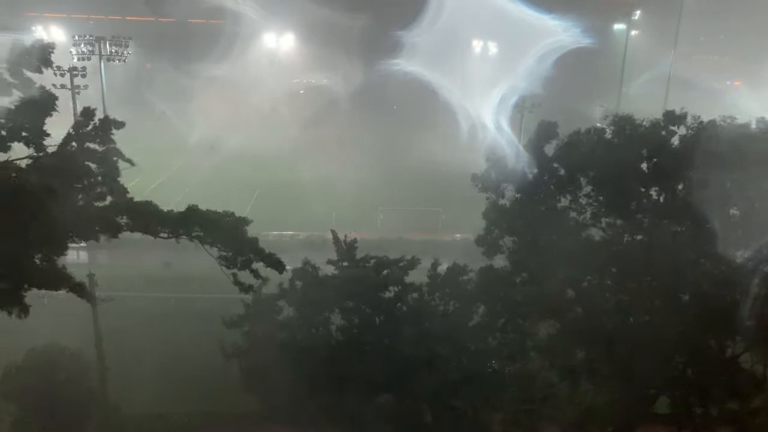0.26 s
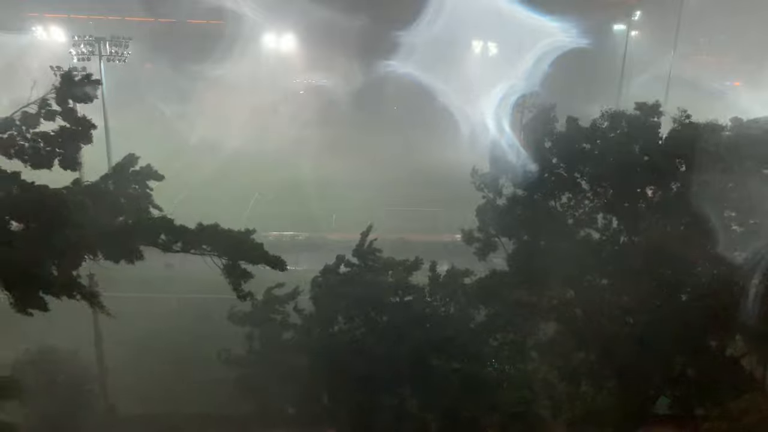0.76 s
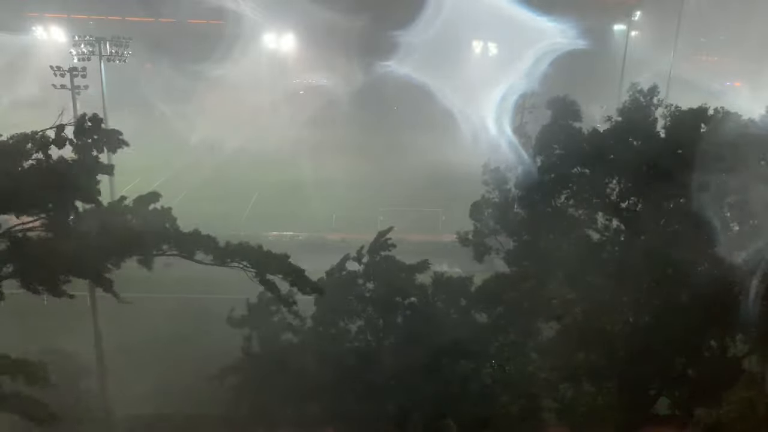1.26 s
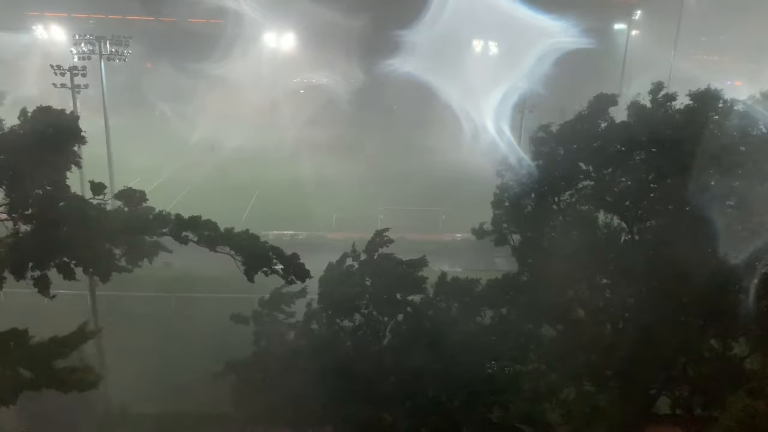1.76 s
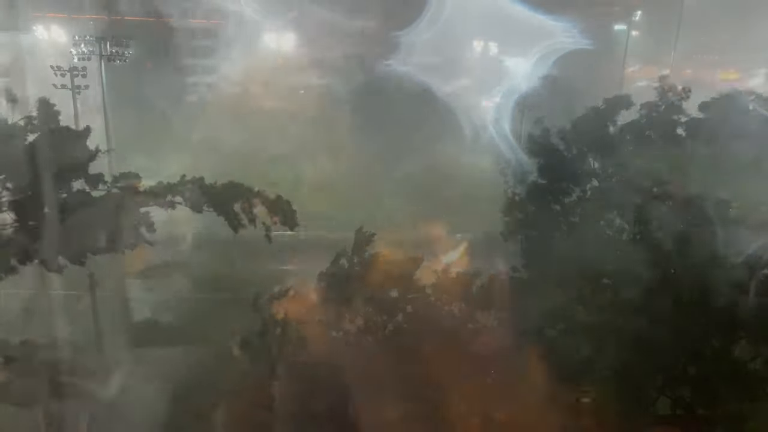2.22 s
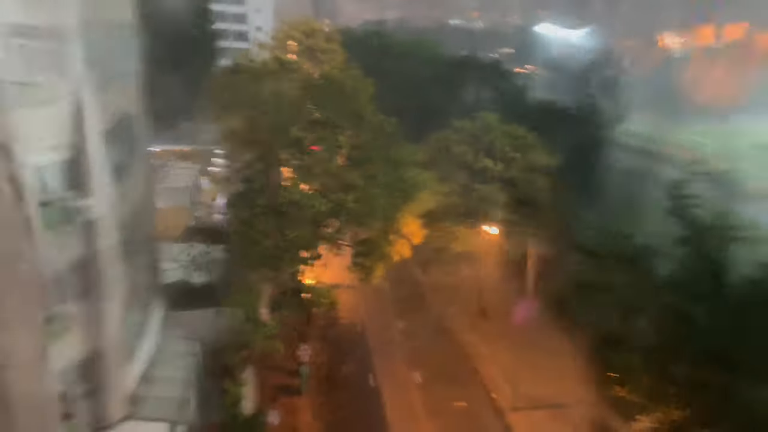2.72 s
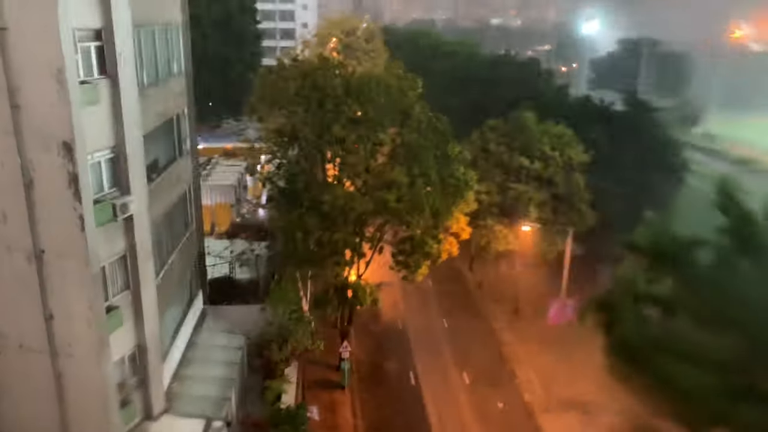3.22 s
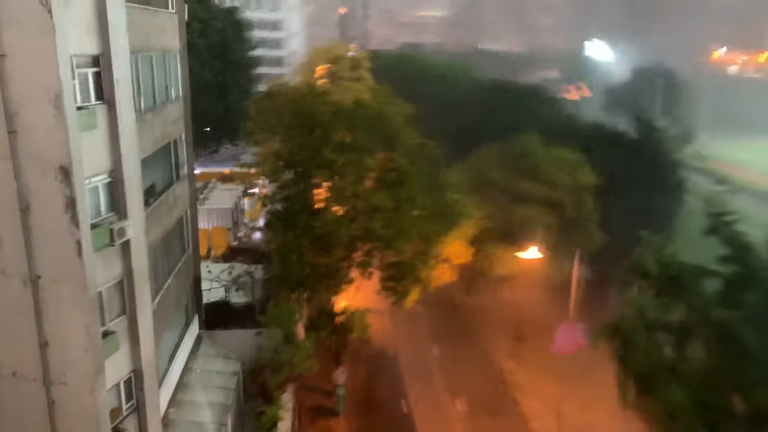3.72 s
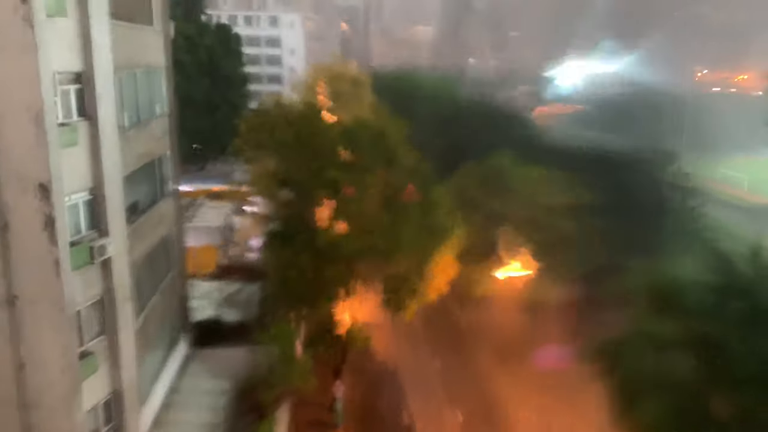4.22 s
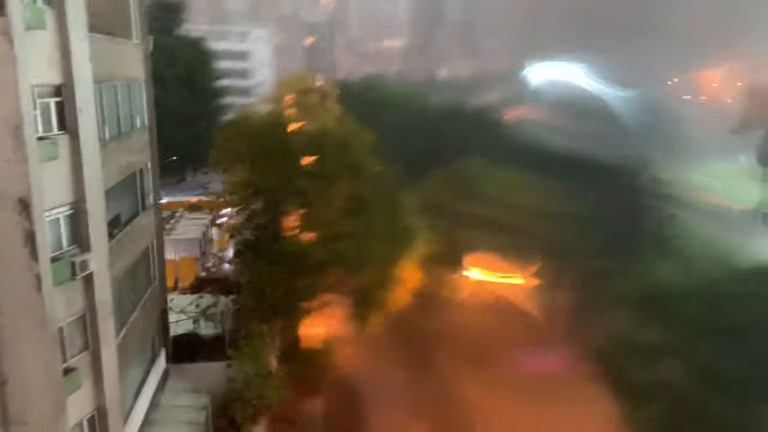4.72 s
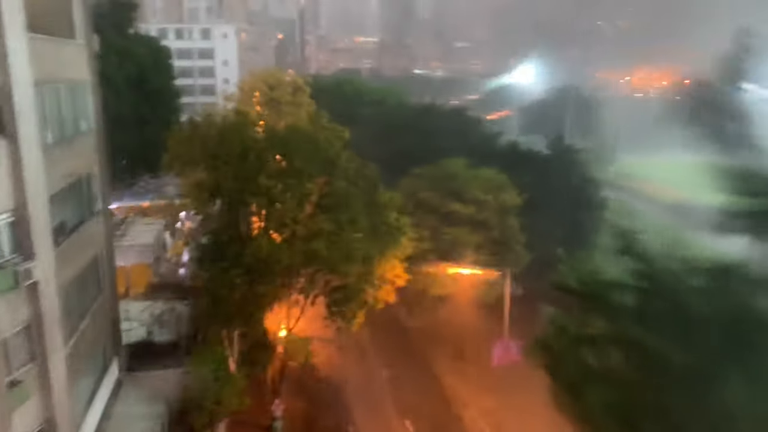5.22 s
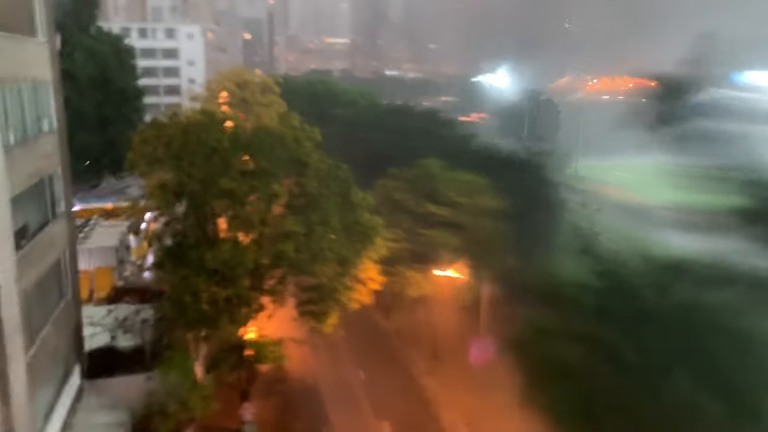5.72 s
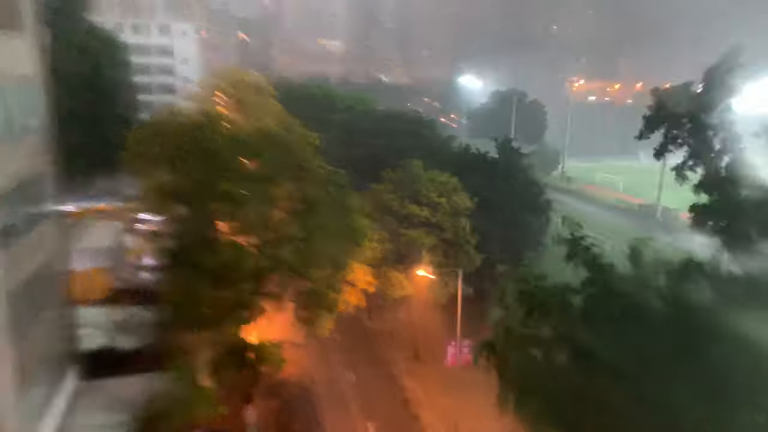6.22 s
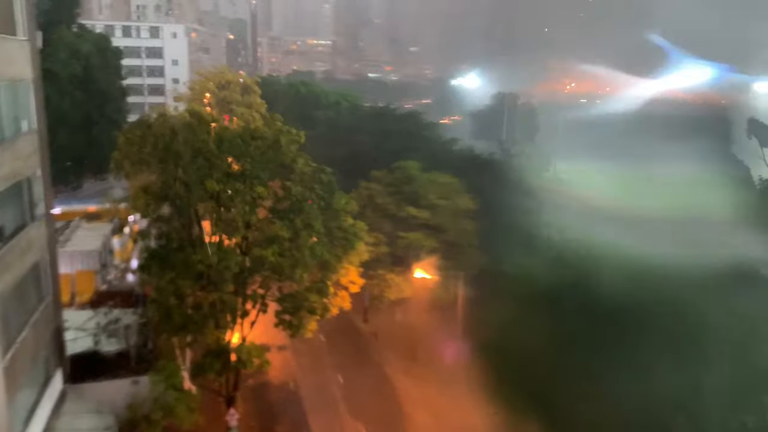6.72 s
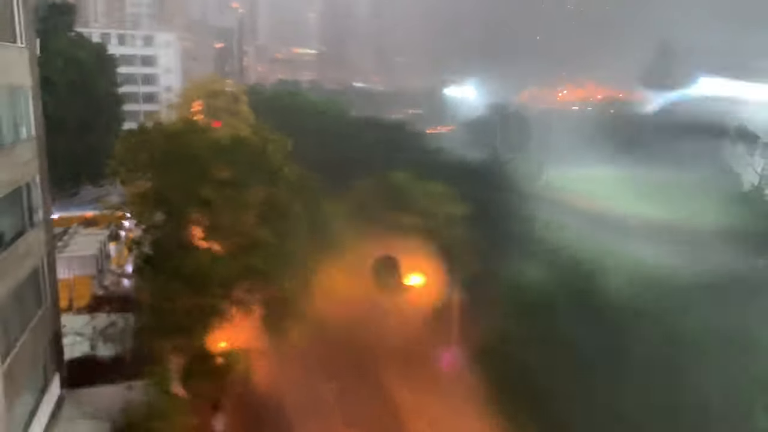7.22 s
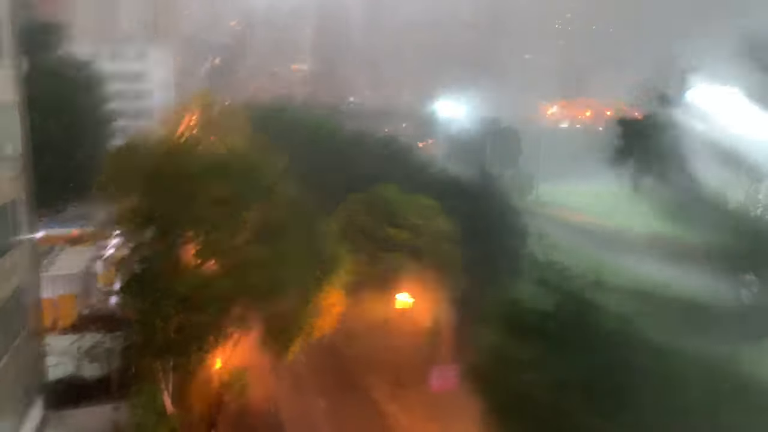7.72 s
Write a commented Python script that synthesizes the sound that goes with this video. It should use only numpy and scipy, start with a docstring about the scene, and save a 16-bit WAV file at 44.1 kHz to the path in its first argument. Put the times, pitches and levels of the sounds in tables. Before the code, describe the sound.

Inside a room during a violent night storm, dull, quiet rain lies under deep wavering wind and thunder rumble. After about two seconds it crossfades to a closer window: dense drops rattle on the glass in irregular sheets, with hissing spray, resonant splats, short pings and hollow whooshes. The frame gives one thump midway and a cluster of heavy low thuds near the end. Close, wide stereo.

```python
"""A room behind a closed window in a thunderstorm, heard in two scenes that crossfade.
Muffled rain noise outside gives way to dense random drops that excite the pane's modes.
Noise through the room's low modes makes the boom of wind and far thunder; decaying sines make thumps and pings.
Noise bursts make splats; resonated noise makes whooshes. The treble mostly reaches the right port first."""
import sys
import numpy as np
from scipy import signal
from scipy.fft import rfft, irfft, next_fast_len
from scipy.io import wavfile
from scipy.ndimage import uniform_filter1d, map_coordinates

SR = 44100
rng = np.random.default_rng(int(sys.argv[2]) if len(sys.argv) > 2 else 0)


def master_out(mix):
    """Clip the mix to full scale and print it as 16-bit PCM to the path in sys.argv[1]."""
    frames = np.transpose(np.atleast_2d(mix))
    ceiling = np.clip(frames, -1, 1)
    pcm = np.round(ceiling * 32767).astype(np.int16)
    wavfile.write(sys.argv[1], SR, pcm)


N = 351069
T = np.arange(N) / SR

# slow storm levels: (time [s], drumming [dB], spray [dB])
RAIN_LEVELS = [(0.0, -42.5, -58), (1.13, -39.5, -55.5), (1.9, -40.5, -57.5), (2.25, -42.5, -53),
               (2.66, -43.5, -55), (2.95, -39, -50.5), (3.13, -37, -51), (3.22, -30.5, -51.5),
               (3.45, -28.5, -39.5), (3.75, -26.5, -42), (4.08, -36, -49), (4.3, -27, -39.5),
               (4.65, -21.5, -35), (4.83, -25, -39.5), (5.3, -29.5, -37), (5.65, -26.5, -38),
               (5.85, -28.5, -42.5), (6.2, -29, -43.5), (6.76, -32, -45), (6.9, -26.5, -42),
               (7.2, -24, -40), (7.45, -22.5, -35), (7.7, -25.5, -39), (7.96, -27.5, -39)]
# pane modes: (frequency [Hz], width [Hz], relative level [dB])
PANE_MODES = [(362, 11.6, -3), (461.7, 11.3, -4.5), (549.6, 19.6, -5), (715, 20.5, -7.5), (804.6, 22, -5),
              (957, 23.5, -5), (1030, 51, -7), (1106, 26, -3.5), (1195, 22, -1), (1320, 14.7, 6),
              (1417, 30, -6.5), (1526, 42, -1.5), (1693, 38, -6), (1726, 20, -5.5), (1784, 55, -4.5),
              (1915, 43, -1), (2075, 19, 3.5), (2127, 56, -9.5), (2260, 42, -7), (2440, 58, -11.5),
              (2490, 61, -11), (2660, 50, -6), (2940, 25, -18), (3090, 23, -15), (3230, 50, -14),
              (3535, 28, -11.5), (3850, 39, -22), (4110, 33, -26), (4480, 44, -12)]
# port balance, boom and outside rain, then window: (frequency [Hz], left minus right [dB])
BALANCE_FAR = [(60, -2.5), (120, -0.5), (240, -1), (480, 0.5), (950, 2), (1890, 2), (3770, 3), (7520, -1.5),
               (15000, 0)]
BALANCE_NEAR = [(60, -4), (120, 5), (240, -2), (480, 3.5), (950, 6.5), (1890, 2.5), (3770, 3.5), (7520, -2),
                (15000, 2.5)]
# port delay, far, near and shared treble: (frequency [Hz], lag of left [cycles])
LAG_FAR = [(0, 0), (800, 0), (1400, .15), (2000, .48), (2800, .6), (3500, 1)]
LAG_NEAR = [(0, 0), (700, -.03), (1000, .05), (1150, .2), (1250, .4), (1340, .42), (1400, .22), (1450, .4),
            (1560, .13), (1680, .45), (1850, .4), (2000, .2), (2270, .14), (2560, -.15), (2640, .62),
            (3000, .58), (3300, .88), (3600, 1)]
LAG_TREBLE = [(4400, 1.05), (7100, 1.5), (9200, 2), (11500, 2.5), (13500, 3), (15500, 3.5)]
# port likeness, far and near: (frequency [Hz], left-right correlation [0..1])
ALIKE_FAR = [(60, 1), (250, 0.92), (600, 0.64), (1000, 0.11), (1400, 0.45), (2000, 0.26), (3200, 0.32),
             (5500, 0.053), (7500, 0.54), (9000, 0.63), (10400, 0.28), (11000, 1), (15700, .99)]
ALIKE_NEAR = [(60, 1), (250, .93), (500, .75), (780, .3), (1000, .35), (1090, .72), (1170, .4), (1300, .7),
              (1560, .45), (1670, .72), (1800, .45), (2060, .82), (2180, .6), (2290, .78), (2600, .1),
              (2740, .65), (2800, .45), (2880, .68), (3060, .2), (3600, .42), (4400, .35), (5500, .1),
              (7500, .42), (9000, .58), (10400, .28), (11000, 1), (15700, .99)]
FAR = (BALANCE_FAR, [*LAG_FAR, *LAG_TREBLE], ALIKE_FAR)
NEAR = (BALANCE_NEAR, [*LAG_NEAR, *LAG_TREBLE], ALIKE_NEAR)


def amp(db):
    """dB to gain."""
    return 10 ** (np.asarray(db) / 20)


def rms(x):
    """Root mean square over all ports."""
    return np.sqrt(np.mean(x ** 2))


def unit(x):
    """x at rms 1."""
    return x / np.sqrt(np.mean(x ** 2) + 1e-20)


def noise_pair():
    """Two unrelated white noises."""
    return rng.standard_normal((2, N))


def along(points, hz):
    """(Hz, value) points interpolated on a log axis."""
    f, v = np.transpose(points)
    return np.interp(np.log(hz + 1), np.log(f + 1), v)


def curves(rows):
    """One value per sample for each column after the time."""
    s, *cols = np.transpose(rows)
    return [np.interp(T, s, c) for c in cols]


def swells(rows):
    """Summed Gaussian level changes in dB, one curve per column after time and 1/e half-length."""
    s, half, *cols = np.transpose(rows)
    coarse_t = T[::64]
    bells = np.exp(-((coarse_t[:, None] - s) / half) ** 2)
    return [np.interp(T, coarse_t, bells @ c) for c in cols]


def wobble(knots_per_s):
    """Smooth random curve through normally distributed knots."""
    knots = rng.standard_normal(int(N * knots_per_s / SR) + 4)
    return map_coordinates(knots, [T * knots_per_s])


def filtered(x, response):
    """x times a complex response of frequency."""
    m = next_fast_len(N + SR // 2)
    return irfft(rfft(x, m) * response(np.fft.rfftfreq(m, 1 / SR)), m)[..., :N]


def coloured(points):
    """Zero-phase gain of a spectrum given as (Hz, dB)."""
    return lambda hz: amp(along(points, hz))


def ringing(modes, top_hz):
    """Causal resonances of alternating polarity, summed and rolled off above top_hz."""
    def response(f):
        peaks = 0
        for k, (centre, width, db) in enumerate(modes):
            peak = 1j * f * width / (centre * centre - f * f + 1j * f * width)
            peaks = peaks + (-1) ** k * amp(db) * peak
        return peaks / (1 + 1j * f / top_hz) ** 2
    return response


def ports(pair, response, field):
    """Colour two signals and mix them to both ports, by likeness, balance and lag; rms 1."""
    balance, lag, alike = field
    m = next_fast_len(N + SR // 4)
    hz = np.fft.rfftfreq(m, 1 / SR)
    # shared part cos, opposed part sin: unrelated inputs correlate by cos(2 * turn)
    turn = np.arccos(np.clip(along(alike, hz), 0, 1)) / 2
    a, b = rfft(pair, m) * response(hz) * [np.cos(turn), np.sin(turn)]
    # half the balance and lag on the left, the inverse on the right
    half_lag = np.exp(-1j * np.pi * np.interp(hz, *np.transpose(lag)))
    left = amp(along(balance, hz) / 2) * half_lag
    return unit(irfft(np.array([(a + b) * left, (a - b) / left]), m)[:, :N])


def shifting(x, depth_db, bins, frames):
    """x under random gain patches, depth_db rms, smoothed over STFT bins and frames; rms 1."""
    z = signal.stft(x, nperseg=512)[2]
    patches = uniform_filter1d(rng.standard_normal(z.shape[1:]), size=bins, axis=0)
    patches = uniform_filter1d(patches, size=frames, axis=1)
    return unit(signal.istft(z * amp(depth_db * unit(patches)), nperseg=512)[1][:, :N])


def patchy(depth_db):
    """Two noises in broad, brief patches."""
    return shifting(noise_pair(), depth_db, bins=8, frames=10)


def drops(rate_per_s, spread_db, share):
    """Random impulses, few of them large, over patchy hiss; share is the impulses' part of the power."""
    chance, size = rng.random((2, 2, N))
    sign = np.sign(chance * SR / rate_per_s - .5)
    hits = (chance < rate_per_s / SR) * amp(-spread_db * np.log(size + 0.017)) * sign
    share = np.clip(share, 0, 1)
    return np.sqrt(share) * unit(hits) + np.sqrt(1 - share) * patchy(depth_db=1.5)


def held(x, steady):
    """A note that feeds itself: its chance swings of level are partly evened out."""
    power = np.abs(uniform_filter1d(x.mean(axis=0) ** 2, size=500))
    return unit(x / (power / power.mean() + .05) ** (np.clip(steady, 0, 1) / 2))


def boom():
    """Wind and far thunder shake the room's lowest modes: shaped and resonated noise in three bands."""
    # (time [s], deep boom [dB], rumble [dB], drone [dB])
    levels = [(0.0, -30, -26, -32), (0.36, -37, -32.5, -37.5), (0.75, -36.5, -36, -37.5),
              (1.2, -28.5, -30.5, -33), (1.5, -37.5, -35.5, -37), (1.9, -31, -33.5, -36),
              (2.3, -41.5, -38, -43), (2.7, -42, -42, -41.5), (3.1, -39.5, -39.5, -42),
              (3.3, -37, -36, -35.5), (3.85, -38, -33.5, -33.5), (4.2, -36, -34, -39.5),
              (4.65, -43, -32.5, -29.5), (5.1, -40.5, -38, -37.5), (5.8, -37.5, -34, -36),
              (6.2, -44, -41.5, -38.5), (6.6, -47, -39, -39.5), (7.0, -43, -36.5, -33),
              (7.578, -44, -29.5, -34.5), (7.605, -37, -29, -30), (7.68, -27, -27, -24.5),
              (7.73, -23, -34, -32), (7.84, -29, -29, -35), (7.96, -39, -34, -32)]
    # (time [s], 1/e half-length [s], deep boom change [dB], rumble change [dB])
    rolls = [(0.1, 0.08, 6.5, -12.5), (0.48, 0.1, 18.5, -0.5), (0.62, 0.052, -1, 10), (0.9, 0.085, 12.5, 6),
             (1.13, 0.036, 17.5, 5.5), (1.49, .03, 3.5, 2), (1.63, 0.036, 15.5, 4), (2.03, 0.036, 9, -5),
             (2.48, 0.057, 6, 6.5), (4.0, .04, 7, -11), (4.06, .03, -6, 3), (4.48, 0.033, -2, -8),
             (4.71, 0.019, 15, 5), (5.22, 0.048, 12, 5), (5.35, 0.036, 5, 3), (6.11, 0.052, -1, 6),
             (6.42, 0.13, 6, 7)]
    # deep boom spectrum: (frequency [Hz], relative density [dB])
    deep_spectrum = [(15, -25), (24, 8), (31, 7.5), (39, 13.5), (48, 6), (60, -15), (90, -54), (200, -120)]
    # low room modes, response squared below: (frequency [Hz], width [Hz], level before squaring [dB])
    low_modes = [(71.85, 12, -0.5), (108, 13, -3)]
    # next room modes: (frequency [Hz], width [Hz], relative level [dB])
    high_modes = [(135.5, 27, -1), (163, 14.5, -1), (190.4, 23.7, -4), (253.3, 36, -6), (321, 30, -8),
                  (398, 53, -13)]
    deep_db, rumble_db, drone_db = curves(levels)
    deep_change_db, rumble_change_db = swells(rolls)
    low_response = ringing(low_modes, top_hz=200)
    deep = ports(noise_pair(), coloured(deep_spectrum), FAR)
    rumble = ports(noise_pair(), lambda hz: low_response(hz) ** 2, FAR)
    drone = ports(noise_pair(), ringing(high_modes, top_hz=400), FAR)
    drone_db = drone_db + 0.15 * rumble_change_db + 1.7 * wobble(5)
    out = amp(deep_db + deep_change_db) * deep
    out += amp(rumble_db + rumble_change_db) * rumble
    return out + amp(drone_db) * drone


def rain_levels():
    """Drumming and spray in dB: slow storm plus sheets of rain flung at the glass."""
    # (time [s], 1/e half-length [s], drumming change [dB], spray change [dB])
    sheet_swells = [(2.08, 0.095, 1, 8.5), (2.7, 0.033, 1, 4), (2.77, 0.028, 1.5, 2.5),
                    (2.985, 0.02, 4, 0.5), (3.03, 0.031, 4.5, 3), (3.068, 0.013, 5, 4),
                    (3.26, 0.074, 4, 11.5), (3.395, 0.014, 3, 0), (3.44, 0.046, -3.5, -4),
                    (3.54, 0.0069, 5, 2), (3.81, 0.016, -7, -2), (3.49, 0.0098, 5.5, 3),
                    (3.63, 0.011, -5, 3), (3.685, 0.0069, 2.5, 5.5), (3.83, 0.0063, 4, 2),
                    (3.88, 0.037, 0.5, 4), (3.95, 0.01, 0.5, 6.5), (4.01, 0.01, 5, 3),
                    (4.157, 0.0069, -1, 2), (4.19, 0.013, 3.5, 0.5), (4.225, 0.011, -2, 2),
                    (4.27, 0.0088, -2, 1.5), (4.3, 0.0085, 3, -5), (4.395, 0.015, -3, 0),
                    (4.44, .02, 0, -2.5), (4.5, 0.033, -1, -1), (4.62, 0.044, 0.5, 1.5),
                    (4.67, .012, -5.5, -5), (4.73, 0.075, 2.5, 4), (5.16, 0.051, 6, 3.5),
                    (5.32, 0.066, 4.5, 2), (5.39, .03, -2, -4), (5.46, 0.036, 2.5, 0.5),
                    (5.59, 0.018, -1, 2.5), (5.95, 0.013, 2, 4), (6.075, 0.073, 2, 5),
                    (6.18, 0.026, -2, 0.5), (6.28, 0.035, 2, 4), (6.87, 0.013, 3, 5), (7.09, 0.012, 0.5, 4),
                    (7.29, 0.079, 1.5, 1.5), (7.43, 0.031, 1.5, 1), (7.6, 0.024, 3, 2.5),
                    (7.92, 0.025, 2.5, 1.5)]
    return np.add(curves(RAIN_LEVELS), swells(sheet_swells))


def rain():
    """Filtered hiss from outside gives way to drops driven against the glass, which rings in its modes."""
    # spectra: (frequency [Hz], relative density [dB])
    muffled_spectrum = [(60, -120), (150, -11), (300, 1), (500, 2.5), (950, -6), (1300, -4.5), (1600, -1.5),
                        (1800, -1), (2050, -8), (2450, 2.5), (2950, -9.5), (3400, -6), (4500, -15),
                        (9000, -120)]  # rain outside
    far_spray_spectrum = [(1500, -120), (3000, -15), (4500, -1), (6000, 0), (8000, -4.5), (10000, -9.5),
                          (11000, -20), (12000, -25), (14000, -27), (15700, -43)]
    patter_spectrum = [(60, -120), (150, -16.5), (300, -2.5), (600, -4), (1200, -4.5), (2300, -1),
                       (2600, -11.5), (2900, -7.5), (3500, -15), (4600, -22.5), (6000, -47), (9000, -120)]  # rain on wall and frame
    near_spray_spectrum = [(1500, -120), (3000, 8), (4500, 1), (6000, -0.5), (8000, -3), (10000, -5),
                           (12000, -14.5), (14000, -9.5), (14700, -23), (15700, -31)]
    fade_start_s, fade_end_s = 1.82, 2.88
    drum_db, spray_db = rain_levels()
    near = np.clip((T - fade_start_s) / (fade_end_s - fade_start_s), 0, 1)
    gusts = near * (0.2 * wobble(9) + 0.25 * wobble(25))  # break the rain into sheets

    outside = ports(patchy(depth_db=1.33), coloured(muffled_spectrum), FAR)
    far_spray = ports(patchy(depth_db=1.5), coloured(far_spray_spectrum), FAR)

    blows = drops(rate_per_s=1500, spread_db=2.5, share=0.41)
    # the rain moves over the pane and favours other modes
    roving = shifting(blows, depth_db=2.0, bins=2, frames=14)
    pane = ports(roving, ringing(PANE_MODES, top_hz=4760), NEAR)
    patter = ports(patchy(depth_db=1.5), coloured(patter_spectrum), NEAR)
    glass = unit(pane + amp(-2.5) * patter)
    near_spray = ports(blows, coloured(near_spray_spectrum), NEAR)

    # near spray takes over early in the crossfade, near drumming later
    drum_share, spray_share = near ** 1.5, near ** 0.25
    drumming = np.sqrt(1 - drum_share) * outside + np.sqrt(drum_share) * glass
    hiss = np.sqrt(1 - spray_share) * far_spray + np.sqrt(spray_share) * near_spray
    return amp(drum_db + 0.34 * gusts) * drumming + amp(spray_db + 0.43 * gusts) * hiss


def splats():
    """A big drop bursts in a short hiss and sets the pane ringing: one noise burst drives both."""
    # (time [s], burst level before attack and decay [dB], pane drive re burst before 7 dB cut [dB])
    big_drops = [(1.069, -44, 8), (1.279, -46, 8), (2.079, -52, 9), (3.042, -30, 6), (3.2426, -34, 4),
                 (3.261, -27, 11), (3.384, -37, 5), (3.485, -30, 8), (3.616, -30.5, 24), (3.662, -40, 6),
                 (3.729, -31, 10), (3.8758, -39, 15), (4.292, -35, -3), (4.3206, -31.5, 0),
                 (4.561, -27.5, -2), (4.648, -29, 17), (5.15, -36, -6), (5.4814, -33, -12),
                 (6.653, -30.5, 2)]
    # bursting drop: (frequency [Hz], relative density [dB])
    splash_spectrum = [(1500, -120), (3500, -1.5), (6000, 3.5), (9000, -1), (12000, -5), (15700, -16)]
    t60_s, attack_s = 0.055, 0.0016
    burst, knock = np.zeros((2, N + SR)), np.zeros((2, N + SR))
    t = T[:SR // 10]
    envelope = amp(-60 * t / t60_s) * (1 - np.exp(-t / attack_s))
    for s, db, ring_db in big_drops:
        noise = rng.standard_normal((2, len(t))) * envelope
        span = slice(round(s * SR), round(s * SR) + len(t))
        burst[:, span] += amp(db) * noise
        knock[:, span] += amp(db + ring_db) * noise
    hiss = rms(burst) * ports(burst[:, :N], coloured(splash_spectrum), NEAR)
    ring = rms(knock) * ports(knock[:, :N], ringing(PANE_MODES, top_hz=5000), NEAR)
    return hiss + amp(-7.0) * ring


def thumps():
    """Pressure makes the window jump in its frame: sines of about two cycles, some falling in pitch."""
    # (time [s], level before decay and 0.6 port gain [dB], final pitch [Hz], extra early phase [cycles])
    blows = [ (4.8671, -15, 310, 0), (4.8706, -13, 105, 0), (7.587, -13.5, 150, 0), (7.6, -8.5, 53, 0),
             (7.65, -14.5, 48, 0), (1.113, -16, 44.7, 0.095), (7.642, -24, 290, 0.065),
             (7.651, -22, 290, 0), (7.727, -27, 190, 0), (7.63, -22, 90, 0.11), (7.67, -20, 140, 0.091),
             (7.683, -22, 160, 0.05), (7.7015, -18.5, 90, .05), (7.749, -22, 47.3, 0.062),
             (7.781, -18, 62, 0.075), (7.804, -18, 65, 0.033), (7.862, -23, 80, 0.064),
             (7.898, -26, 100, 0.076)]
    snap_s, attack_s = .0025, .0003
    out, t = np.zeros(N + SR), T[:SR // 8]
    for s, db, hz, snap_cycles in blows:
        cycles = hz * t + snap_cycles * (1 - np.exp(-t / snap_s))
        fade = amp(-3.5 * (t * hz) ** 3.5) * (1 - np.exp(-t / attack_s))
        out[round(s * SR):][:len(t)] += amp(db) * fade * np.sin(2 * np.pi * cycles)
    return out[:N] * [[-.6], [.6]]  # opposite polarity at the ports


def hollow():
    """Gusts whoosh across a gap in the frame: noise through its low and high resonances."""
    # (time [s], level re slow drumming before 3 dB cut [dB])
    levels = [(2.1, -7), (2.6, -12.5), (2.8, -10.5), (3.2, -17), (3.55, -9.5), (3.9, -10), (4.2, -13),
              (4.9, -8), (5.5, -6.5), (6.5, -18), (7.96, -11.5)]
    # (time [s], 1/e half-length [s], low note change [dB], high note change [dB])
    whooshes = [(2.582, 0.038, 17, -8), (2.76, 0.04, 19.5, -15), (2.841, 0.024, 21, -8),
                (2.914, 0.018, 18, -4), (2.992, 0.012, 5, 17), (3.065, 0.012, 4, 4), (3.27, .12, 18.5, 13),
                (3.404, 0.018, 10, 3), (3.705, 0.022, 10.5, 4), (3.893, 0.032, 11, 12),
                (4.297, 0.036, -3, 10), (4.56, .04, -10, 2), (5.172, 0.061, 3, 11), (5.28, 0.023, 2, 8),
                (5.697, 0.055, 5, 1), (6.06, 0.029, 0, 15), (6.3, 0.038, 15.5, 14), (6.667, 0.038, 6, 12),
                (6.864, .05, 3, 3), (7.902, 0.049, 6, 10.5)]
    # gap resonances: (frequency [Hz], width [Hz], relative level [dB])
    gap_low = [(1582, 66, 3), (1801, 22, 2.5)]
    gap_high = [(2283, 65, 6)]
    level_db = curves(RAIN_LEVELS)[0] + curves(levels)[0] - 3
    fade_in = np.clip((T - levels[0][0]) / 0.091, 0, 1)
    notes = 0
    for gap, change_db in zip((gap_low, gap_high), swells(whooshes)):
        note = held(ports(noise_pair(), ringing(gap, top_hz=1510), NEAR), steady=0.25)
        notes = notes + amp(change_db + 1.2 * wobble(11)) * note
    return fade_in * amp(level_db) * notes


def pings():
    """A drop lands where one pane mode answers alone: a decaying sine, alike at both ports but for balance and
    lag."""
    # (time [s], level before attack, decay and port balance [dB], pitch [Hz])
    single_notes = [(3.487, -22, 958), (3.488, -26, 2720), (3.536, -24, 2370), (3.618, -20, 2274),
                    (3.683, -27, 1610), (4.152, -28, 1530), (4.425, -32, 2100), (4.44, -19, 1313),
                    (4.5, -27, 2360), (4.71, -22, 2130), (6.867, -29, 1540), (7.004, -18.5, 1944),
                    (7.217, -28, 1030)]
    t60_s, attack_s = 0.11, 0.0026
    out, t = np.zeros(N + SR), T[:SR // 5]
    fade = amp(-60 * t / t60_s) * (1 - np.exp(-t / attack_s))
    for s, db, hz in single_notes:
        out[round(s * SR):][:len(t)] += amp(db) * fade * np.sin(2 * np.pi * hz * t)
    dry_pings = out[:N]
    # the likeness still sets the gain; the empty second input adds nothing
    return rms(dry_pings) * ports(np.array([dry_pings, 0 * T]), np.ones_like, NEAR)


def scene():
    """All sources at the two ports."""
    return boom() + rain() + splats() + thumps() + hollow() + pings()


def record(dry):
    """Sharp band limit: nothing from 15750 Hz up."""
    return filtered(dry, lambda hz: hz < 15750)


dry = scene()
out = record(dry)
master_out(out)
```